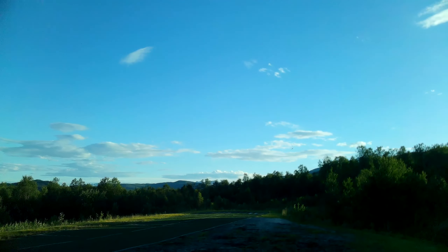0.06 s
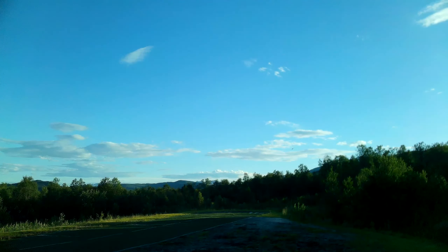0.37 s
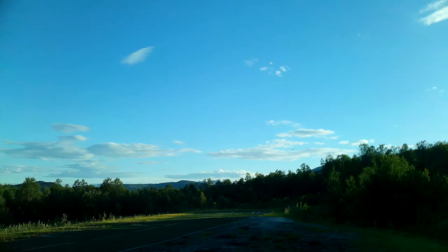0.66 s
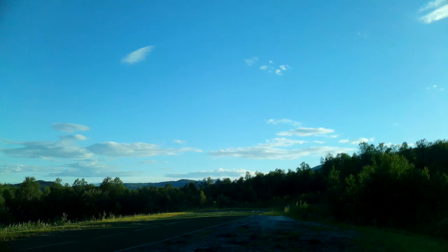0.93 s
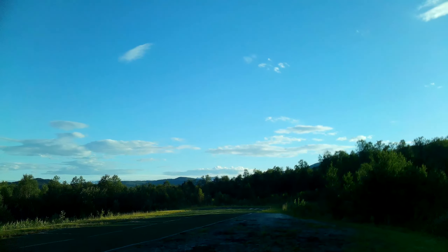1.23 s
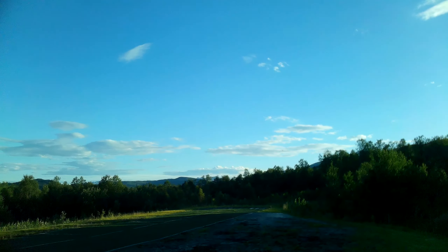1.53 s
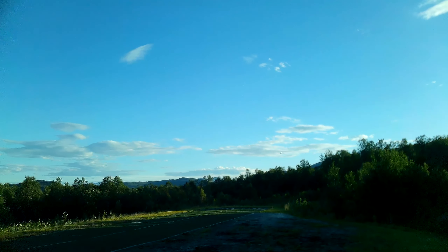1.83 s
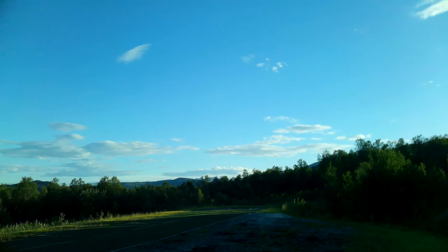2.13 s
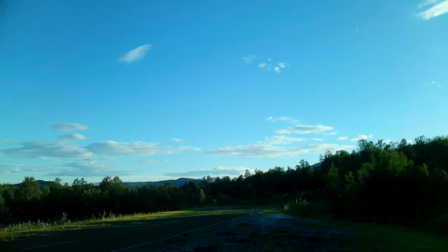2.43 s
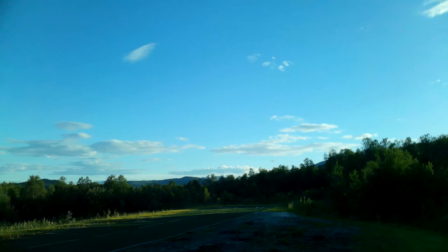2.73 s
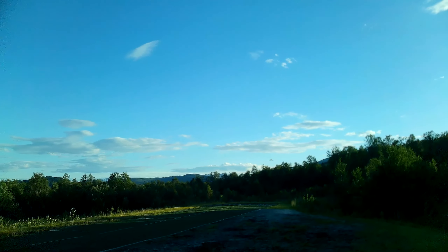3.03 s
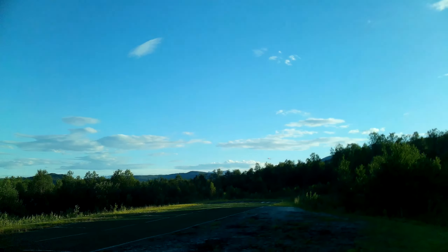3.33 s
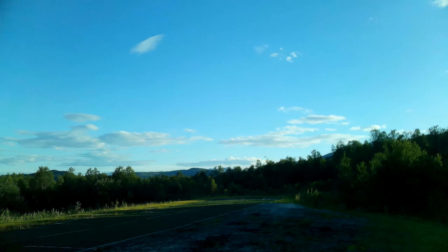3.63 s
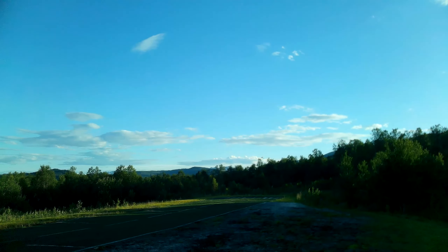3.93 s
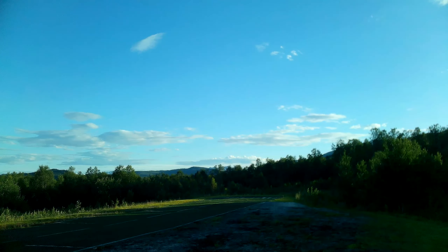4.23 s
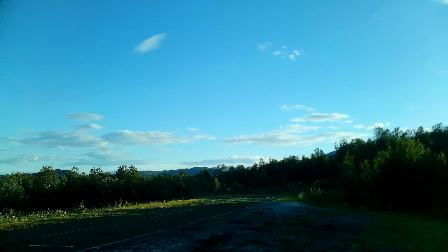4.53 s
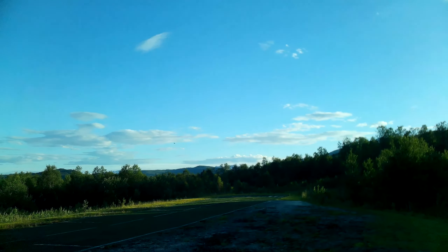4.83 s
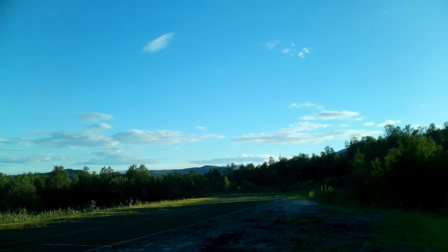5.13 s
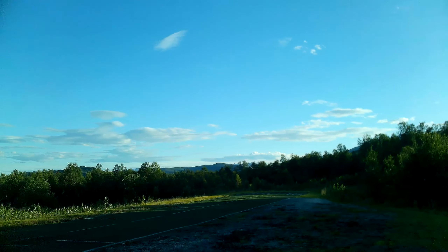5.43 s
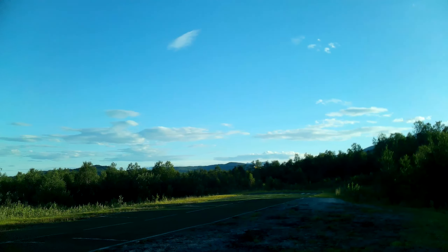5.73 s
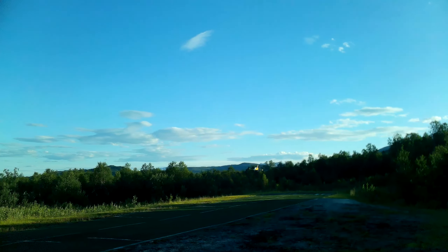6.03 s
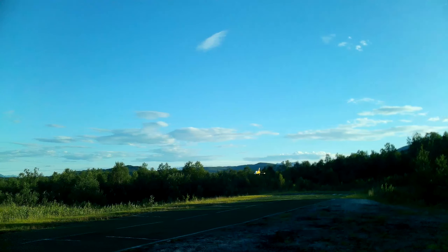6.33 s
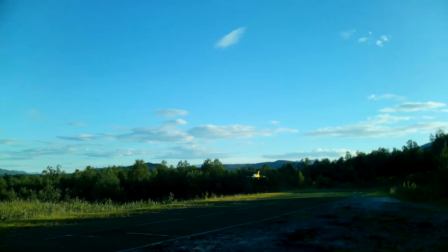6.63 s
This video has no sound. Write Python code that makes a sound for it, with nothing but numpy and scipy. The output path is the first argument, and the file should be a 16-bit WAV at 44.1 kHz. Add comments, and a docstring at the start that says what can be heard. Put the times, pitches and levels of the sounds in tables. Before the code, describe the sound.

Over a quiet airfield edged by trees, a model jet flies toward the microphone with a thin, fluttering whine and hissing air. The pitch sinks as it coasts, then steps up and down while the sound gradually grows. Finally it opens up close by, with a loud rush and a rising whine. A lens motor ticks very faintly near the microphone over a soft low rumble of air.

```python
"""Model jet over a grassy airfield

A model jet approaches, its throttle worked up and down, then opens up close by. Its nine-bladed ducted
fan radiates gliding harmonics of the blade-passing frequency over the noise of turbulent air.
Interference with the ground reflection colours both with a moving comb. Near the microphone a small
motor, probably in a lens, chirps faintly; the evening air rumbles."""
import sys
import numpy as np
from scipy import signal
from scipy.fft import rfft, irfft
from scipy.io import wavfile
from scipy.ndimage import uniform_filter1d, map_coordinates

SR = 44100
rng = np.random.default_rng(int(sys.argv[2]) if len(sys.argv) > 2 else 0)


def put_to_file(sound):
    """Save the sound as 16-bit audio at rate SR, in the file named by the first command-line argument."""
    columns = np.atleast_2d(sound).T  # one column per channel
    safe = np.clip(columns, -1, 1)
    whole_steps = np.round(safe * 32767)
    wavfile.write(sys.argv[1], SR, whole_steps.astype(np.int16))


N = 303408
TIME = np.arange(N) / SR
BLADES, CRUISE_HZ = 9, 3400  # "octaves" is fan speed relative to this blade-passing frequency


def from_db(db):
    """Amplitude grows tenfold for every 20 dB."""
    return 10 ** (np.asarray(db) / 20)


def rms_one(x):
    """Normalisation to unit mean power."""
    return x / np.sqrt(np.mean(x ** 2) + 1e-20)


def in_time(rows):
    """Linear interpolation of each column over time, one value a sample."""
    seconds, *columns = np.transpose(rows)
    return [np.interp(TIME, seconds, column) for column in columns]


def noise(spectrum):
    """Spectral shaping of white noise, scaled to rms 1."""
    hz, db = np.transpose(spectrum)
    bins = np.maximum(np.fft.rfftfreq(N, 1 / SR), 1)
    gain = from_db(np.interp(np.log(bins), np.log(hz), db, left=-90, right=-90))
    return rms_one(irfft(rfft(rng.standard_normal(N)) * gain, N))


def drift(rate_hz):
    """Low-pass noise: a random fluctuation of rms 1 at about the given rate."""
    bins = np.fft.rfftfreq(N, 1 / SR)
    return rms_one(irfft(rfft(rng.standard_normal(N)) / (1 + (bins / rate_hz) ** 2), N))


def narrowband(phase, width_hz):
    """Random quadrature modulation spreads a carrier into a noise band of rms 1."""
    return drift(width_hz) * np.cos(phase) + drift(width_hz) * np.sin(phase)


def fluttering_tone(phase, flutter_db, skirt_db):
    """Scintillation: turbulent air modulates a tone's phase and level; a rough skirt surrounds it."""
    carrier = np.sqrt(2) * np.sin(phase + .15 * drift(14))
    return carrier * from_db(flutter_db * drift(11.6)) + from_db(skirt_db) * narrowband(phase, 420)


# Spectra of the outdoor rumble, the microphones' hiss and the difference between the two microphones.
# Each row: frequency in Hz, relative spectral density in dB.
RUMBLE_SPECTRUM = [(12, -5), (20, 1), (190, -9.5), (278, -13.5), (514, -17.5), (999, -22), (1190, -23),
                   (1580, -25), (1840, -24), (2380, -26.5), (2640, -25.5), (5980, -29), (9000, -36),
                   (11700, -85), (19800, -120)]
MIC_HISS_SPECTRUM = [(7000, -35), (9400, -13), (11500, -7), (12700, -1), (13200, -6.5), (13900, -1.5),
                     (14300, -2), (15200, -13), (17000, -32)]
SIDE_SPECTRUM = [(15, 18), (70, 4), (300, 4), (1000, -0.5), (4000, -10), (10000, -10), (13000, -21.5),
                 (15500, -15)]


def background(flicker_hz=15):
    """The noise floor: ambient rumble and the microphones' self-noise, which flickers."""
    flicker = 1 - .27 * np.cos(2 * np.pi * flicker_hz * TIME + drift(.73))
    hiss = from_db(-77 + .28 * drift(39)) * flicker * noise(MIC_HISS_SPECTRUM)
    rumble = from_db(-71.6) * noise(RUMBLE_SPECTRUM)
    side = from_db(-80) * noise(SIDE_SPECTRUM) * [[1], [-1]]
    return rumble + hiss + side


# Runs of the lens motor. Each row: start in seconds, level in dB.
LENS_RUNS = [(.068, -70.5), (.392, -69), (0.865, -68), (1.265, -66.5), (1.765, -70), (2.09, -70.5),
             (2.566, -70.5), (2.866, -68), (3.365, -69), (3.767, -69.5), (4.268, -69.5), (4.564, -69.5),
             (5.07, -69.5), (5.387, -68.5), (5.864, -68.5), (6.265, -60)]


def lens_motor(ring_hz=11290, step_hz=117, run_s=.053, edge_s=.015):
    """Forced vibration: short runs of motor steps keep one high resonance ringing."""
    envelope = np.zeros(N)
    for start_s, level_db in LENS_RUNS:
        t = TIME - start_s
        steps = 1 - .31 * np.cos(2 * np.pi * step_hz * t)
        gate = np.clip(np.minimum(t, run_s - t) / edge_s + .5, 0, 1)
        envelope += from_db(level_db) * steps * gate
    rasp = noise([(6000, -37), (9500, -15), (11300, -5), (14500, -9), (16000, -15)])
    ring = np.sqrt(2) * np.sin(2 * np.pi * ring_hz * TIME + .3 * drift(60))
    return envelope * (ring + from_db(-6) * rasp)


def tree_echoes(x, t60_s=1.0, cutoff_hz=5000):
    """Scattering at the forest edge returns sparse, dull echoes that decay exponentially."""
    t = TIME[:SR // 2]
    echoes = rng.standard_normal(len(t)) * (rng.random(len(t)) < .02)
    echoes *= from_db(-60 * t / t60_s) * (t > .02)
    dull = signal.sosfilt(signal.butter(1, cutoff_hz, fs=SR, output="sos"), x)
    return signal.fftconvolve(dull, echoes / np.sqrt(np.sum(echoes ** 2)))[:N]


def delayed(x, lag_ms):
    """Propagation delay along a path of changing length."""
    return map_coordinates(x, [(TIME - lag_ms / 1000) * SR], order=3, mode="constant")


# The ground reflection. Each row: time in seconds, lag behind the direct sound in milliseconds.
REFLECTION_LAG = [(0, 1.73), (1.2, 1.488), (2.3, 1.27), (2.7, 1.24), (3.1, 1.105), (4.1, 1.06), (4.5, 0.97),
                  (4.75, .869), (5.0, 0.79), (5.4, .73), (5.7, 0.67), (6.1, 0.753), (6.35, 0.73),
                  (6.6, 0.67), (6.88, .615)]


def ground_effect(x, turf, soil, soil_lag_ms=.08):
    """Comb interference: turf inverts a grazing wave, and the firm soil reflects it just after."""
    lag_ms, = in_time(REFLECTION_LAG)
    strength = np.clip(1 - .71 * (lag_ms - .98), 0, 1)  # a steeper, later reflection is weaker
    return x + strength * (soil * delayed(x, lag_ms + soil_lag_ms) - turf * delayed(x, lag_ms))


def nearness(approach_db, from_level_db=-18.5, range_db=12):
    """Level as a cue to distance: 0 far off, 1 close by."""
    return np.clip((approach_db - from_level_db) / range_db, 0, 1)


def power_law(octaves, approach_db, cruise_db, db_per_octave, share):
    """A level in dB: amplitude follows a power of fan speed and a share of the approach."""
    return cruise_db + db_per_octave * octaves + share * approach_db


def coasting_loss(loss_db=13, start_s=1.62, end_s=2.39, fade_s=.35):
    """An unloaded fan radiates less: the dB lost while the throttle is shut."""
    return loss_db * np.clip(np.minimum(TIME - start_s, end_s - TIME) / fade_s, 0, 1)


def duct_hum(octaves, approach_db, resonance_hz=530):
    """Air-column resonance: the flow excites one low mode of the duct, heard while the jet is far off."""
    level_db = power_law(octaves, approach_db, cruise_db=-65.5, db_per_octave=27, share=.48)
    gain = (1 - nearness(approach_db)) * from_db(level_db)
    return gain * narrowband(2 * np.pi * resonance_hz * TIME, width_hz=58)


def motor_whistle(shaft_phase, octaves, approach_db, poles=14):
    """Pole passing: one cycle for each magnet, strongest at cruising speed and close by."""
    off_speed_db = 24 * np.maximum(-octaves, 0) + 55 * np.maximum(octaves, 0)
    level_db = approach_db - 53 + 5 * nearness(approach_db) - off_speed_db - coasting_loss()
    return from_db(level_db) * fluttering_tone(poles * shaft_phase, flutter_db=2.5, skirt_db=-20)


def rush_level(octaves, approach_db):
    """Flow noise grows with speed: the level of the rushing air in dB."""
    return power_law(octaves, approach_db, cruise_db=-40, db_per_octave=13.7, share=1) - coasting_loss()


# Tones at multiples of the shaft speed: weak tones of the uneven rotor, and at 36 the blades' fourth harmonic.
# # Each row: multiple of shaft speed, relative level in dB far off and close by.
SHAFT_HARMONICS = [(4, -15.5, -23.5), (6, -27, -26), (13, -16, -26), (20, -36, -30), (22, -46, -12.5),
                   (23, -27, -24), (36, -10, -23)]


def shaft_tones(shaft_phase, octaves, approach_db, absorption_hz=10000):
    """Rotor asymmetry radiates weak harmonics of the shaft speed, and the blades add a faint fourth harmonic;
    the air absorbs the highest."""
    tones, near = 0, nearness(approach_db)
    base_db = rush_level(octaves, approach_db) + 20 * np.minimum(octaves, 0)
    for multiple, far_db, near_db in SHAFT_HARMONICS:
        octaves_above = octaves + np.log2(multiple / BLADES * CRUISE_HZ / absorption_hz)
        absorbed_db = 35 * np.maximum(octaves_above, 0)
        flutter_db = 2.5 * drift(6)
        level_db = base_db + far_db + near * (near_db - far_db) + flutter_db - absorbed_db
        tones += from_db(level_db) * np.sqrt(2) * np.sin(multiple * shaft_phase + .5 * drift(21))
    return tones


# Spectra of the exhaust: its low roar close by and far off, its rush and its high hiss.
# Each row: frequency in Hz, relative spectral density in dB.
NEAR_ROAR_SPECTRUM = [(60, -1), (200, -0.5), (420, -7.5), (560, -1), (740, -4.5), (850, 5.5), (930, 3),
                      (1060, -4.5), (1270, 3), (1600, -5.5), (2600, -55)]
FAR_ROAR_SPECTRUM = [(100, 5.5), (400, -0.5), (650, 0), (850, 1.5), (1100, -3.5), (1400, -4), (1750, -5),
                     (2600, -5)]
RUSH_SPECTRUM = [(900, -26), (1600, -11.5), (2000, -9), (2400, -6.5), (2900, -8), (4000, -3.5), (4800, 0.5),
                 (5400, 0), (6300, -5), (7200, -8.5), (9000, -21)]
HISS_SPECTRUM = [(5000, -52), (7200, -1), (8600, 2.5), (9500, 1.5), (10400, 4.5), (11400, -2.5), (12100, 1),
                 (13000, -10), (13600, -3), (15300, -15.5), (17000, -38)]


def exhaust(octaves, approach_db):
    """Turbulent mixing radiates broadband noise, each band growing with fan speed at its own rate."""
    near = nearness(approach_db)
    roar_db = power_law(octaves, approach_db, cruise_db=-57, db_per_octave=14.8, share=.65)
    hiss_db = power_law(octaves, approach_db, cruise_db=-43, db_per_octave=11.3, share=1.1)
    roar = np.sqrt(near) * noise(NEAR_ROAR_SPECTRUM) + np.sqrt(1 - near) * noise(FAR_ROAR_SPECTRUM)
    rush = from_db(rush_level(octaves, approach_db)) * noise(RUSH_SPECTRUM)
    return from_db(roar_db) * roar + rush + from_db(hiss_db) * noise(HISS_SPECTRUM)


def blade_swish(shaft_phase, octaves, approach_db):
    """Spectral broadening: the blades chop eddies into a hump of noise around their tone."""
    level_db = power_law(octaves, approach_db, cruise_db=-50, db_per_octave=27, share=.79)
    swish = narrowband(BLADES * shaft_phase, width_hz=500)
    # close by, a low drone follows the fan at half its shaft speed
    drone = nearness(approach_db) * from_db(-17) * narrowband(.5 * shaft_phase, width_hz=37)
    return from_db(level_db - coasting_loss()) * (swish + drone)


# Directivity: the blade tones beamed at the listener as the jet turns.
# Each row: time in seconds, relative levels of the first, second and third harmonic in dB.
BLADE_DIRECTIVITY = [(0, -50, -47, -60), (.1, -27.5, -51, -62), (.25, -48, -42, -64),
                     (.42, -38.5, -50, -62), (.6, -35, -60, -64), (.83, -30, -46, -64),
                     (1.05, -37.5, -77, -69), (1.27, -33.5, -48, -62), (1.45, -37, -42, -67),
                     (1.65, -45, -38, -64), (2.3, -46, -37, -60), (2.5, -41, -45, -59),
                     (2.74, -40, -39.5, -54), (2.95, -42.5, -49, -58), (3.38, -36, -48, -56),
                     (3.56, -43, -40.5, -62), (3.95, -45, -31, -66), (4.1, -51, -38, -64),
                     (4.35, -40, -34.5, -59), (4.7, -40, -40, -50), (5.25, -38.5, -41.5, -54),
                     (5.38, -47, -40, -56), (5.49, -36.5, -44, -50), (5.72, -44.5, -57, -50),
                     (5.88, -39, -37.5, -56), (6.02, -43.5, -45.5, -49), (6.1, -41, -39, -45.5),
                     (6.27, -44, -30.5, -50.5), (6.5, -52.5, -36, -60), (6.67, -36.5, -50.5, -65),
                     (6.88, -34, -42.5, -42)]


def blade_whine(shaft_phase, octaves, approach_db, db_per_octave=(24, 22, 12), full_octaves_per_s=5.9):
    """Blade loading radiates three harmonics, which grow with fan speed and acceleration."""
    flutter_db = 1.04 + .85 * (1.5 - nearness(approach_db))  # a longer air path flutters more
    spin_up = np.clip(np.gradient(octaves) * SR / full_octaves_per_s, 0, 1)
    load_db = 3 * spin_up - coasting_loss(loss_db=19, start_s=1.83, end_s=2.1, fade_s=.06)
    whine = 0
    for k, (beam_db, growth_db) in enumerate(zip(in_time(BLADE_DIRECTIVITY), db_per_octave), 1):
        level_db = approach_db + beam_db + growth_db * octaves + load_db - 1.3
        whine += from_db(level_db) * fluttering_tone(k * BLADES * shaft_phase, flutter_db, skirt_db=-13)
    return whine


# Fan speed set by the throttle. Each row: time in seconds, blade-passing frequency in Hz.
THROTTLE = [(0, 3351), (.14, 3543), (.49, 3583), (.87, 3574), (.92, 3864), (1.18, 3790), (1.48, 2977),
            (1.69, 1869), (1.79, 1560), (1.84, 2228), (2.13, 1870), (2.29, 2110), (2.39, 2165),
            (2.65, 3417), (2.78, 3455), (2.89, 3091), (3.16, 3098), (3.37, 2207), (3.52, 2061),
            (3.95, 2052), (4.18, 1923), (4.34, 2427), (4.8, 2501), (4.89, 2312), (4.98, 2374), (5.07, 2837),
            (5.34, 2827), (5.64, 2034), (5.81, 2034), (5.99, 3010), (6.07, 3229), (6.23, 3229),
            (6.29, 3405), (6.37, 3410), (6.44, 3393), (6.59, 3391), (6.69, 3890), (6.82, 4255),
            (6.88, 4335)]


def blade_passing_hz(inertia_s=.055):
    """Rotational inertia smooths every change of the throttle."""
    demanded_hz, = in_time(THROTTLE)
    return uniform_filter1d(demanded_hz, int(inertia_s * SR), mode="nearest")


# Loudness of the nearing jet. Each row: time in seconds, relative level at cruising speed in dB.
APPROACH_LEVEL = [(0, -39.5), (.25, -40), (.9, -34), (1.5, -30), (2.7, -32), (3.2, -30), (4.1, -30),
                  (4.5, -25), (5.1, -26), (5.5, -22.5), (5.98, -19.5), (6.1, -9), (6.3, -7), (6.58, -7),
                  (6.88, -4.5)]


def scene():
    """Superposition of the jet, its reflections and the quiet field."""
    blade_hz = blade_passing_hz()
    shaft_phase = 2 * np.pi * np.cumsum(blade_hz / BLADES) / SR
    octaves = np.log2(blade_hz / CRUISE_HZ)
    approach_db, = in_time(APPROACH_LEVEL)
    air = exhaust(octaves, approach_db) + blade_swish(shaft_phase, octaves, approach_db)
    air *= from_db(1.06 * drift(15))  # the level flutters slightly
    air += shaft_tones(shaft_phase, octaves, approach_db)
    whine = blade_whine(shaft_phase, octaves, approach_db)
    # the compact fan meets deep notches, the spread-out exhaust shallower ones
    jet = ground_effect(whine, turf=.76, soil=.22) + ground_effect(air, turf=.48, soil=.19)
    jet += motor_whistle(shaft_phase, octaves, approach_db) + duct_hum(octaves, approach_db)
    # close by, a little of the roar arrives from the sides
    side_roar = nearness(approach_db) * from_db(-82.5) * noise(NEAR_ROAR_SPECTRUM) * [[1], [-1]]
    return jet + side_roar + from_db(-17.5) * tree_echoes(jet) + lens_motor() + background()


def record(dry, cutoff_hz=15300):
    """Band limiting: an elliptic low-pass cuts the top steeply."""
    return signal.sosfilt(signal.ellip(12, .1, 80, cutoff_hz, fs=SR, output="sos"), dry)


dry = scene()
out = record(dry)
put_to_file(out)
```